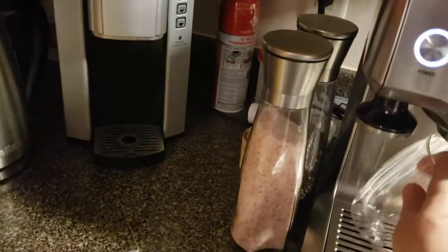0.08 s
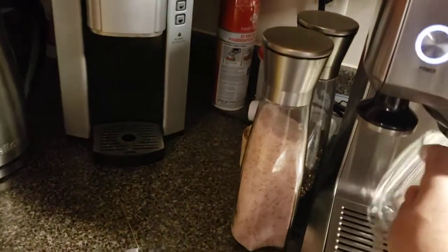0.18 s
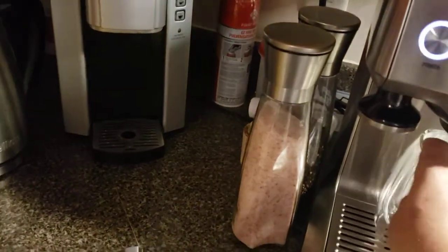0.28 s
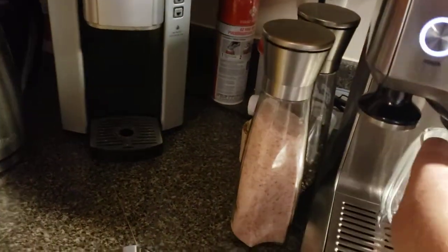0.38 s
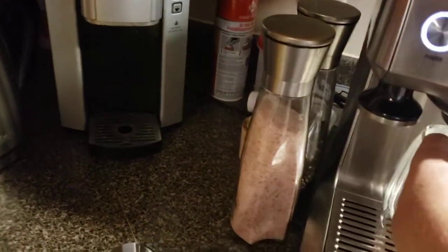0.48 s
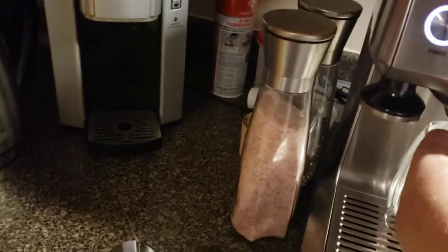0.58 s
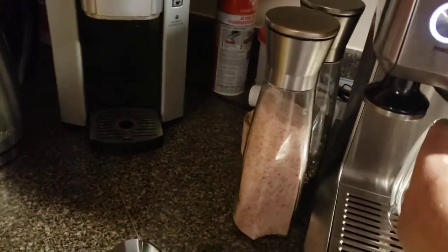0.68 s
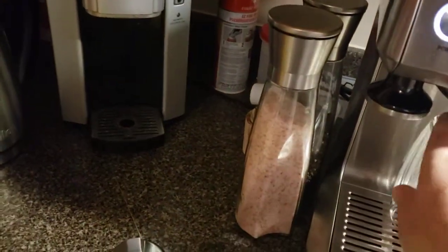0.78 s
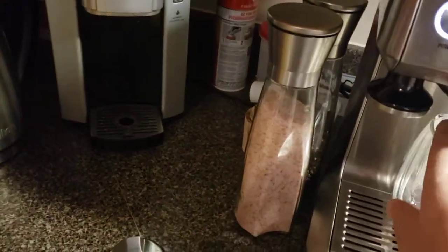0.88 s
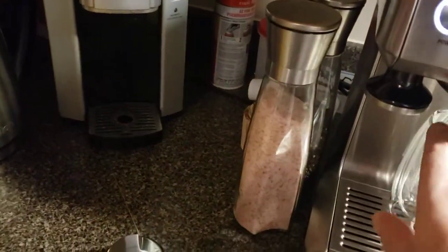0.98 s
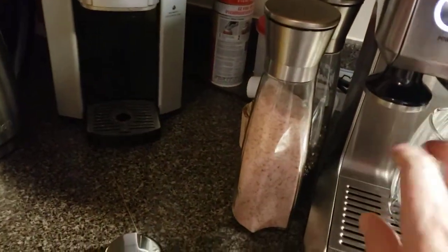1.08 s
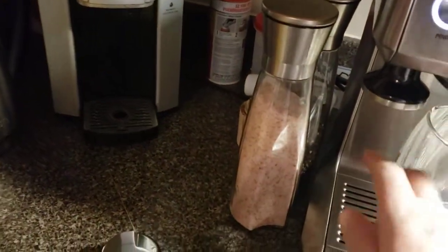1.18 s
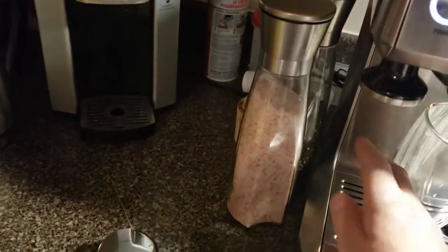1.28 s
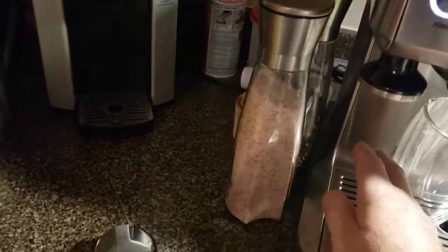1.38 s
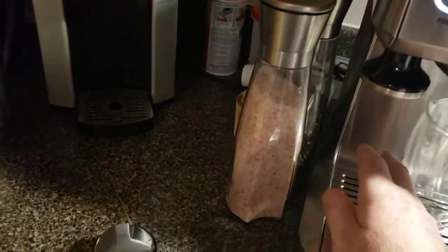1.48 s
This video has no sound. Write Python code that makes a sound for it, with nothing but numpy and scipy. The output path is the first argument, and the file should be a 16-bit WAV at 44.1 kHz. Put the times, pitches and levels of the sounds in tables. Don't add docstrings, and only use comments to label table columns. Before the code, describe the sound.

Heavy glass on metal, recorded very close in a small kitchen: a gritty scrape, one bright hard knock with a dull tray thud, a low puff of air, then clattering, squeaky rocking and a last light clink.

```python
import sys
import numpy as np
from scipy import signal
from scipy.fft import rfft, irfft
from scipy.io import wavfile
from scipy.ndimage import uniform_filter1d

SR = 44100
rng = np.random.default_rng(int(sys.argv[2]) if len(sys.argv) > 2 else 0)


def nominal_scale(level):
    x = np.asarray(level, float) / 20
    return 10 ** x


def generate_wav(sig):
    pcm = np.round(np.clip(np.atleast_2d(sig).T, -1, 1) * 32767).astype(np.int16)
    wavfile.write(sys.argv[1], SR, pcm)


N = 66150
T = np.arange(N) / SR


def unit(x):
    return x / np.sqrt(np.mean(x ** 2))


def curve(rows, axis=1):
    rows = np.array(rows, float)
    return np.interp(T, rows[:, 0], rows[:, axis])


def colour(x, points, lag_s=0.):
    n = x.shape[-1]
    f = np.arange(n + 1) * SR / (2 * n) + 1e-3
    p = np.array(points, float)
    gain = nominal_scale(np.interp(np.log(f), np.log(p[:, 0]), p[:, 1]))
    delay = np.exp(-2j * np.pi * f * lag_s)
    return irfft(rfft(x, 2 * n) * gain * delay, 2 * n)[..., :n]


def mode(x, hz, t60):
    pole = np.exp(2j * np.pi * hz / SR - np.log(1000) / (t60 * SR))
    return signal.lfilter([1], [1, -pole], x).imag


def band(x, hz, width):
    return unit(mode(x, hz, np.log(1000) / (np.pi * width)))


def walk(rate):
    k = int(SR / rate)
    return unit(uniform_filter1d(uniform_filter1d(rng.standard_normal(N), k), k))


def wide(mid, side, side_db):
    return mid + nominal_scale(side_db) * side * np.array([[1], [-1]])


# freq_hz, level_db (per Hz)
KITCHEN_HUM = [(15, -50.5), (25, -23), (44, -0.5), (65, -4.5), (125, -21), (243, -12.5), (446, -23.5),
               (514, -16), (1800, -52), (2340, -77), (3960, -120)]
# freq_hz, level_db (per Hz)
RECORDER_HISS = [(900, -43), (1800, -10), (3200, -7.5), (5200, -15), (6300, -6.5), (8500, -11.5),
                 (10500, -9.5), (12600, 2.5)]
KITCHEN_DB, HISS_DB = -63, -66
ALIKE_BELOW_HZ = 3000


def kitchen():
    spectrum = KITCHEN_HUM + [(2500, -77.5)]
    mid = unit(colour(rng.standard_normal(N), spectrum))
    side = unit(colour(rng.standard_normal(N), spectrum))
    side = colour(side, [(ALIKE_BELOW_HZ / 2, -10), (ALIKE_BELOW_HZ * 4.5, 0)])
    hiss = unit(colour(rng.standard_normal((2, N)), RECORDER_HISS))
    return nominal_scale(KITCHEN_DB) * wide(mid, side, 0) + nominal_scale(HISS_DB) * hiss


# time_s, level_db
SHAKING = [(0, -30), (.03, -52), (.1, -58), (.22, -59), (.3, -42), (.5, -70.5), (.63, -64), (.67, -56.5),
           (.72, -60.5), (.76, -59), (.9, -48.5), (1.04, -53.5), (1.1, -70), (1.5, -66.5)]
# freq_hz, width_hz, level_db
COUNTER_MODES = [(49, 5, -6.5), (91, 30, 0.5), (218, 63, -10)]


def rumble():
    def shake():
        parts = 0
        for hz, width, db in COUNTER_MODES:
            once = band(rng.standard_normal(N), hz, width)
            parts = parts + nominal_scale(db) * band(once, hz, 2 * width)
        return parts

    return nominal_scale(curve(SHAKING)) * wide(shake(), shake(), side_db=-12.5)


PUFF_S, PUFF_RISE_S, PUFF_FALL_S, PUFF_REACH_S = .4045, .045, .04, .085
PUFF_DB, PUFF_LEAK_DB = -25, -22
PUFF_HZ, PUFF_SAG_HZ_PER_S = 58, 60


def puff():
    d = T - PUFF_S
    shape = np.exp(-np.abs(d) / np.where(d < 0, PUFF_RISE_S, PUFF_FALL_S))
    shape = shape * np.exp(-(d / PUFF_REACH_S) ** 4)
    flap = np.cos(2 * np.pi * (PUFF_HZ * d - PUFF_SAG_HZ_PER_S * d ** 2))
    turbulence = 0.13 * band(rng.standard_normal(N), 84, 120)
    return nominal_scale(PUFF_DB) * shape * (flap + turbulence) * np.array([[nominal_scale(PUFF_LEAK_DB)], [1]])


def tone(rows, rough_db, count=1):
    inside = uniform_filter1d(1. * (T >= rows[0][0]) * (T <= rows[-1][0]), 200, mode="nearest")
    phase = 2 * np.pi * np.cumsum(curve(rows)) / SR
    level = np.sqrt(2) * nominal_scale(curve(rows, axis=2) + rough_db * walk(170))
    return inside * level * np.sin(count * phase)


# time_s, pitch_hz, level_db
FINGER_SQUEAK = [
    (0.6, 630, -85),
    (0.688, 624, -63.5),
    (0.79, 602, -88),
]


def squeak():
    return tone(FINGER_SQUEAK, 0.52) + nominal_scale(-19.5) * tone(FINGER_SQUEAK, 2.13, count=3)


# time_s, level_db, rustle_db (low rustle against the hiss)
SLIDE = [(0, -49.5, 3), (.05, -56.5, -6), (.12, -57.5, 0.5), (.18, -59, 5), (.215, -47.5, -12),
         (.25, -44.5, 3), (.33, -60.5, 6.5), (.42, -60.5, 0.5), (.5, -67.5, 8.5), (.56, -70.5, 5),
         (.63, -82, 4), (.7, -85, -7.5)]
# freq_hz, level_db (per Hz)
SLIDE_HISS = [(1000, -6), (1500, 0), (2700, -2), (4000, -7), (5500, -13), (9000, -12.5), (12000, -9),
              (16000, -4)]
# freq_hz, level_db (per Hz)
TRAY_RUSTLE = [(200, -15), (350, -1.5), (600, 0), (900, -4.5), (1300, -19.5), (2200, -34)]
DRAG_FLICKER_DB, GRIT_FLICKER_DB = .8, 1.5


def drag():
    grit = rng.standard_normal((3, N)) * nominal_scale(GRIT_FLICKER_DB * walk(96))
    level = nominal_scale(curve(SLIDE) + DRAG_FLICKER_DB * walk(21))
    hiss = level * unit(colour(grit[0], [(500, -33)] + SLIDE_HISS))
    low = unit(colour(grit[1:], TRAY_RUSTLE)) * level * nominal_scale(curve(SLIDE, axis=2))
    return hiss, wide(low[0], low[1], side_db=-9)


# loudest_s, half_length_s, level_db, pitch_hz, glide_hz_per_s
RUBS = [(0.078, .02, -64.5, 2920, 0), (0.106, .025, -64.5, 1384, 500), (0.086, .03, -62.5, 8160, 0),
        (0.132, .035, -69, 4320, 0), (.143, .015, -59.5, 3050, 0), (0.193, .03, -62, 1620, 503),
        (0.214, 0.032, -59.5, 3700, 3000), (.228, .025, -46, 3030, -1500), (.235, .014, -46.5, 1460, 1500),
        (0.326, .04, -60.5, 1397, 8.5), (0.409, .08, -61, 3047, -4.5), (0.545, .045, -68.5, 3004, 5.5),
        (0.548, .022, -67, 8360, 4), (.795, .008, -65, 8210, 3.5), (.925, .018, -54, 1630, 0),
        (1.446, .006, -65, 3070, 30008)]
RUB_WIDTH, RUB_REF_HZ = .03, 3000


def brushes():
    out = 0
    for s, length, db, hz, glide in RUBS:
        width_hz = hz * RUB_WIDTH * hz / RUB_REF_HZ
        a, b = walk(width_hz), walk(width_hz)
        d = T - s
        phase = 2 * np.pi * (hz * d + glide * d ** 2 / 2)
        swell = nominal_scale(db) * np.exp(-(d / length) ** 4)
        out = out + swell * (a * np.cos(phase) + b * np.sin(phase))
    return out


# start_s, hold_s, level_db, pitch_hz, release_t60_s
FOOT_SQUEALS = [(0.24, 0.0042, -36, 4000, 0.01), (0.807, 0.02, -27.5, 3249, 0.015),
                (0.832, 0.037, -41.5, 3337, 0.068), (0.878, 0.026, -37.5, 3298, 0.067),
                (0.893, 0.0036, -31.5, 3306, 0.1), (0.891, 0.013, -36, 8250, 0.094),
                (0.918, 0.0051, -49.5, 3280, 0.15), (0.974, 0.014, -53, 3280, 0.2),
                (0.975, 0.0073, -52, 3378, 0.32), (1.073, 0.022, -40.5, 3311, 0.039),
                (1.449, 0.04, -36, 3203, 0.028), (1.481, 0.0063, -43, 1600, 0.03),
                (1.478, 0.012, -54, 5190, 0.12), (1.494, 0.011, -37.5, 3260, .05)]
SQUEAL_ATTACK_S, SQUEAL_RISE_PER_S, SWELL_DB_PER_S = 0.00073, 0.48, 121.5
SQUEAL_ROUGH_DB, SQUEALS_DB = 1.5, -2


def squeals():
    out = 0
    for s, hold, db, hz, t60 in FOOT_SQUEALS:
        d = np.clip(T - s, 0, None)
        attack = 1 - np.exp(-d / SQUEAL_ATTACK_S)
        release = nominal_scale(db - 60 * np.clip(d - hold, 0, None) / t60)
        swell = nominal_scale(-SWELL_DB_PER_S * np.clip(hold - d, 0, None))
        rough = nominal_scale(SQUEAL_ROUGH_DB * walk(380))
        phase = 2 * np.pi * hz * (d + SQUEAL_RISE_PER_S * d * np.minimum(d, hold) / 2)
        out = out + attack * release * swell * rough * np.sqrt(2) * np.sin(phase)
    return out * nominal_scale(SQUEALS_DB)


# start_s, level_db, pitch_hz, t60_s
PLINKS = [(.021, -42.5, 483, 0.056), (0.023, -46, 1727, 0.042), (0.127, -51, 5720, 0.029),
          (0.2504, -21.5, 3080, 0.0038), (.2515, -12, 7260, 0.026), (.256, -34.5, 201.4, 0.14),
          (0.2652, -35.5, 312.4, 0.13), (0.881, -49.5, 240.9, 0.43), (0.8028, -31.5, 2200, 0.016),
          (.8015, -52, 3970, 0.018), (0.809, -26, 2180, 0.012), (0.8082, -37.5, 5330, 0.09),
          (.815, -23.5, 1900, 0.0063), (0.864, -26.5, 3880, 0.0073), (0.868, -35.5, 5780, .015),
          (.8665, -49, 2140, 0.011), (.869, -47, 5176, 0.089), (.878, -31, 3520, 0.018),
          (0.886, -53, 1880, 0.0096), (.9725, -36, 2200, 0.046), (.975, -46, 1720, 0.073),
          (1.079, -51, 241.9, 0.26), (1.4495, -42, 2206, 0.013), (1.4685, -41.5, 1800, 0.011),
          (1.475, -40.5, 1960, 0.0095), (1.479, -36, 2020, 0.009), (1.4693, -45, 7100, 0.014)]


def impacts():
    out = 0
    for s, db, hz, t60 in PLINKS:
        late = np.clip(T - s, 0, None)
        out = out + nominal_scale(db - 60 * late / t60) * np.sin(2 * np.pi * hz * late)
    return out


# pitch_hz, level_db, t60_s
TRAY_PANELS = [(55, -10, .2), (96, -5, .15), (200, 2, .1), (238, -6, .35), (321, 1, .1), (505, -2, .06),
               (640, -8, .05), (960, -9, .05)]
THUD_CYCLES = 0.45


def tray(push):
    panels = []
    for hz, db, t60 in TRAY_PANELS:
        share = hz / THUD_CYCLES / SR
        slow_push = signal.lfilter([share], [1, share - 1], push)
        panels.append(nominal_scale(db) * mode(slow_push, hz, t60))
    opposed = sum((-1) ** k * panel for k, panel in enumerate(panels))
    return wide(sum(panels), opposed, side_db=-17)


TOUCH_S, THUD_PUSH_S = .4, 0.00015
CHATTER_PER_S, CHATTER_SPREAD_DB = 2500, 2.5
GRIT, STRIKE = .8, 4.3
TREBLE_HZ = 3500


def contacts(rows, modes, crack, crack_db, ring_db, thump_db, touch_db, twin_detune, twin_db):
    n = int(TOUCH_S * SR)
    after = np.arange(n) / SR
    clinks, push = np.zeros(N + n), np.zeros(N)
    for s, db, t60, thud_db, treble_db in rows:
        chance = rng.random((3, n))
        fade = nominal_scale(db - 60 * after / t60)
        ticks = (chance[0] < CHATTER_PER_S / SR) * nominal_scale(-CHATTER_SPREAD_DB * np.log(chance[1] + 1e-9))
        rattle = unit(ticks * np.sign(chance[2] - .5)) + GRIT * rng.standard_normal(n)
        force = fade * (rattle + STRIKE * (after == 0))
        ring = 0
        for hz, gain_db, ring_t60 in modes:
            spread, twin_side = rng.standard_normal(2)
            twin_hz = hz * (1 + twin_detune * np.sign(twin_side))
            pair = mode(force, hz, ring_t60) + nominal_scale(twin_db) * mode(force, twin_hz, ring_t60)
            ring = ring + nominal_scale(gain_db + touch_db * spread) * pair / 20
        late = np.clip(T - s, 0, None) / THUD_PUSH_S
        push = push + nominal_scale(db + thud_db) * np.exp(-late) * late
        clink = nominal_scale(crack_db) * fade * unit(colour(rattle, crack)) + nominal_scale(ring_db) * ring
        start = int(s * SR)
        clinks[start:start + n] += colour(clink, [(TREBLE_HZ / 2, 0), (TREBLE_HZ * 2, treble_db)])
    return clinks[:N], nominal_scale(thump_db) * tray(push) / 2


# start_s, level_db, chatter_t60_s, thud_db, treble_db
ROCKING = [(.794, -48, 0.12, -26, -21), (.8015, -32.5, 0.018, -16, 7), (.808, -32, 0.14, 7, -1.5),
           (.8655, -33, 0.12, 2, 1), (.877, -32.5, 0.033, 4.5, -3), (.895, -48.5, 0.35, 10, -9.5),
           (.972, -38.5, 0.12, -4, -1), (1.0745, -46.5, 0.1, 12, 0), (1.449, -49.5, 0.18, -1, -2),
           (1.467, -40, 0.1, 7, -8), (1.48, -45, 0.46, 15, -19)]
# pitch_hz, level_db, t60_s
STANDING_MODES = [(1701, -13, 0.09), (2300, -3, 0.0155), (3167, -14.5, 0.018), (3336, -2.5, 0.084),
                  (3884, -1, 0.013), (5190, -6.5, 0.114), (7380, -6, 0.11), (7720, 2, 0.056),
                  (8290, 1.5, 0.051), (9280, -12, 0.04), (10110, -24, 0.17), (11850, -3.5, 0.045),
                  (11550, -8.5, 0.074), (14420, -15, 0.033)]
# freq_hz, level_db
STANDING_CRACK = [(180, -13), (300, -5.5), (2700, -10), (3240, 5.5), (6410, -23), (7570, 1), (10700, -6),
                  (15200, 6.5), (16000, -3)]


def rocks():
    clinks, thump = contacts(ROCKING, STANDING_MODES, STANDING_CRACK, crack_db=0, ring_db=-5, thump_db=-20,
                             touch_db=3, twin_detune=.014, twin_db=-4)
    return clinks * nominal_scale(0.5 * walk(167)), thump


# start_s, level_db, chatter_t60_s, thud_db, treble_db
HELD_KNOCKS = [
    (.0215, -55.5, 0.015, 17, -5.5),
    (.1275, -44, 0.09, -4, -6),
    (.222, -52.5, 0.41, -14.5, 3),
    (.2493, -19, 0.053, -6.5, 6),
    (.262, -41, 0.28, -12.5, -2.5),
    (.27, -37.5, 0.017, 19, 2),
]
# pitch_hz, level_db, t60_s
HELD_MODES = [(1460, -7, .045), (1916, -7, .06), (2236, -9, .06), (2990, 2, .11), (4182, -6, .075),
              (5529, -12, .08), (6013, -20, .06), (7092, -3, .06), (7380, -5, .035), (8323, -4, .07),
              (11330, -12, .06), (13095, -4, .045), (13910, -9, .06), (14865, 0, .045)]
# freq_hz, level_db
HELD_CRACK = [(180, -34), (300, -9), (1900, 0.5), (3030, 4), (5700, -13), (7200, -1), (10700, -13.5),
              (15200, -4), (16000, -43)]


def knocks():
    return contacts(HELD_KNOCKS, HELD_MODES, HELD_CRACK, crack_db=3, ring_db=-4.5, thump_db=-24,
                    touch_db=1, twin_detune=.003, twin_db=-14)


# freq_hz, left_over_right_db
RECORDER_SHADOW = [(200, 0), (700, 1.5), (1290, 11), (2380, 12), (4400, 12.5), (8120, 10), (15000, 4)]
LEFT_LAG_S = 0.0002097
BOUNCE_DB, BOUNCE_S, BOUNCE_HZ = -14.5, (.00031, .00052), 5300


def ports(x):
    half = np.array(RECORDER_SHADOW, float) * [1, .5]
    left = colour(x, half, LEFT_LAG_S)
    right = colour(x, half * [1, -1])
    mirror = [(BOUNCE_HZ / 2, BOUNCE_DB - 21.5), (BOUNCE_HZ, BOUNCE_DB)]
    return np.array([v + colour(v, mirror, lag) for v, lag in zip((left, right), BOUNCE_S)])


ROOM_DB, ROOM_T60_S, ROOM_DARK_HZ = -13.5, 0.24, 6760


def room(near):
    t = T[:SR // 2]
    echo = rng.standard_normal((2, len(t))) * nominal_scale(-60 * t / ROOM_T60_S) * (t > .003)
    echo = signal.lfilter([1], [1, -np.exp(-2 * np.pi * ROOM_DARK_HZ / SR)], echo)
    echo = echo / np.sqrt(np.sum(echo ** 2, axis=1, keepdims=True))
    return nominal_scale(ROOM_DB) * signal.fftconvolve(near.mean(axis=0)[None], echo, axes=1)[:, :N]


TURNED_S, TURNED_PAN_DB = 1.3, 3


def scene():
    held, thud = knocks()
    standing, thump = rocks()
    hiss, rustle = drag()
    glass = ports(held + standing + impacts() + squeals() + hiss + brushes())
    turned = TURNED_PAN_DB / 2 * (T > TURNED_S)
    near = glass * nominal_scale(np.array([turned, -turned])) + thud + thump + rustle
    return near + room(near) + squeak() + rumble() + puff() + kitchen()


def roll_off(x):
    return signal.sosfilt(signal.butter(12, 16650, fs=SR, output="sos"), x)


LOW_CUT_HZ, TOP_HZ, CEILING = 38, 15900, .85


def record(dry):
    low_cut = signal.butter(2, LOW_CUT_HZ, "high", fs=SR, output="sos")
    limited = CEILING * np.tanh(signal.sosfilt(low_cut, dry) / CEILING)
    top_cut = signal.ellip(8, .2, 60, TOP_HZ, fs=SR, output="sos")
    mix = signal.sosfilt(top_cut, limited)
    return roll_off(mix)


dry = scene()
out = record(dry)
generate_wav(out)
```